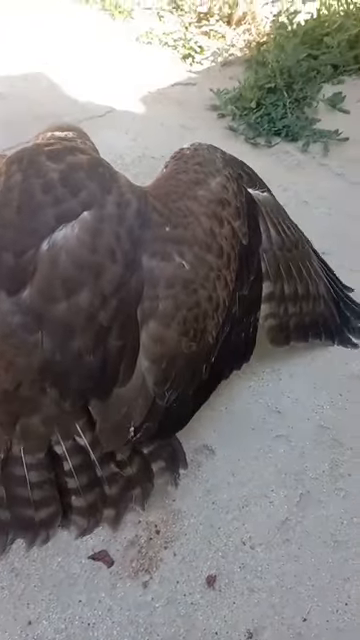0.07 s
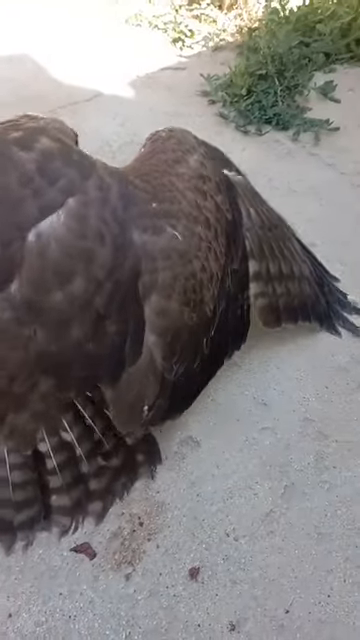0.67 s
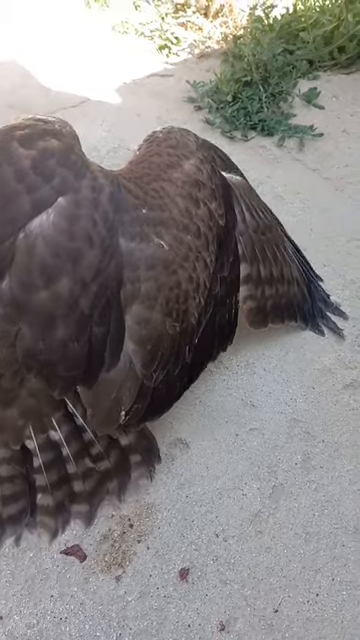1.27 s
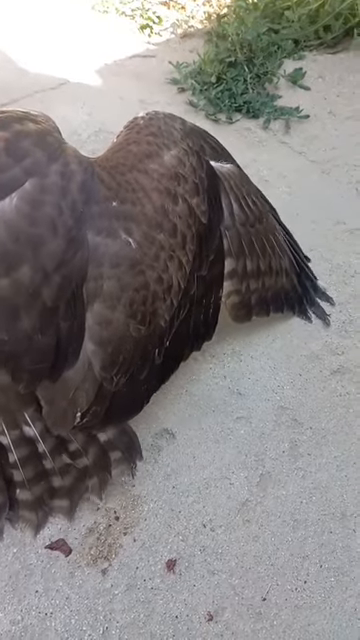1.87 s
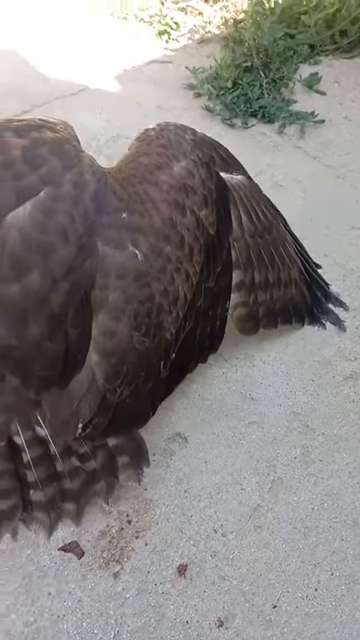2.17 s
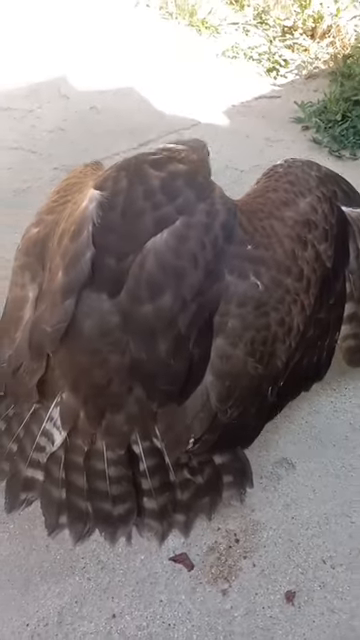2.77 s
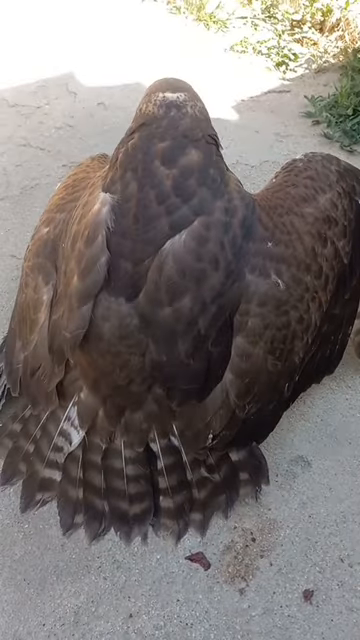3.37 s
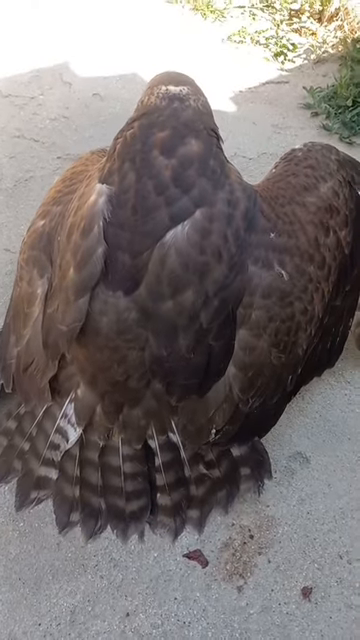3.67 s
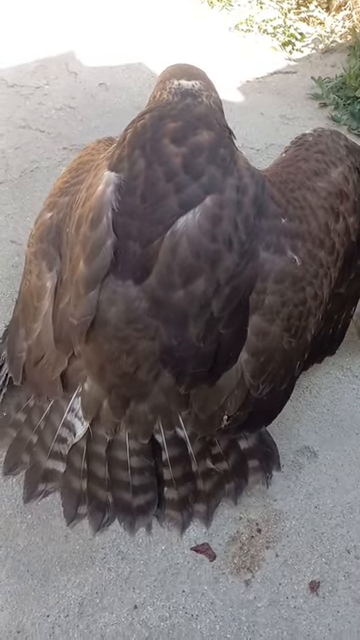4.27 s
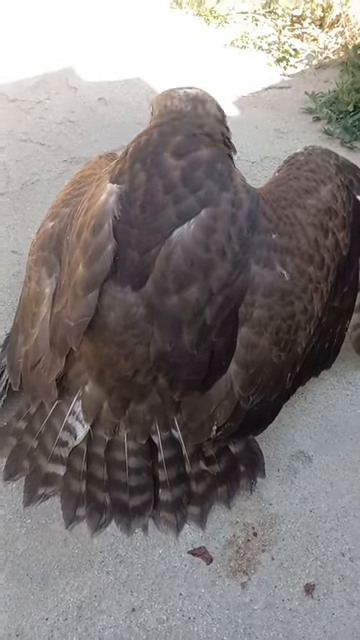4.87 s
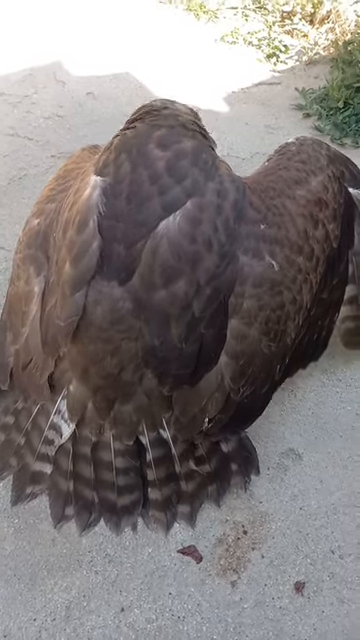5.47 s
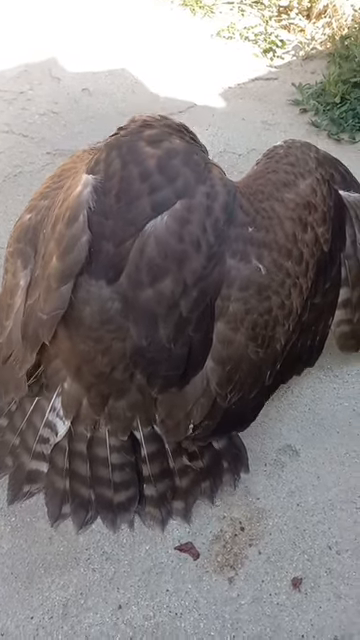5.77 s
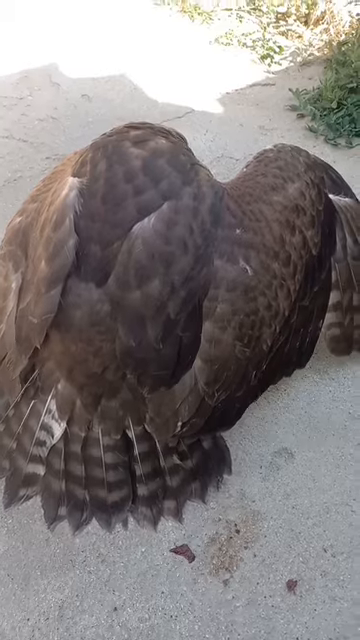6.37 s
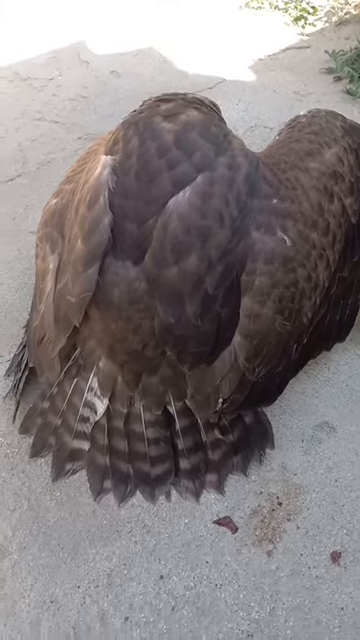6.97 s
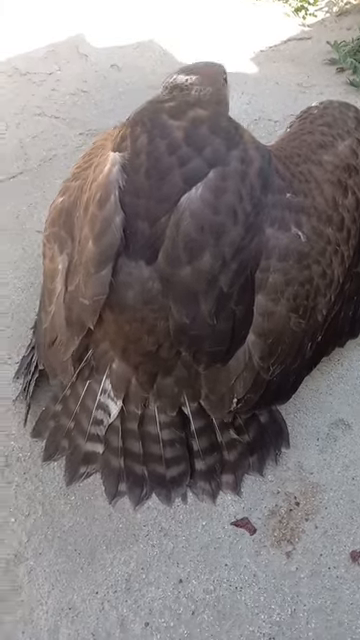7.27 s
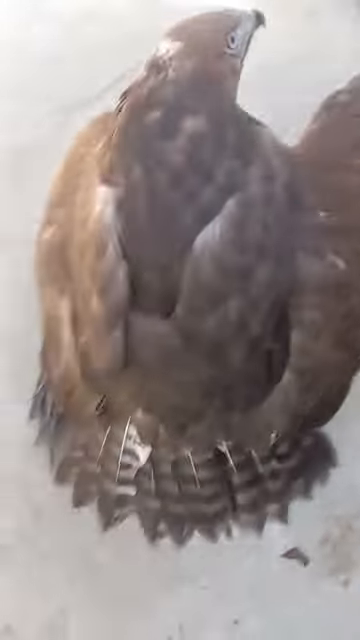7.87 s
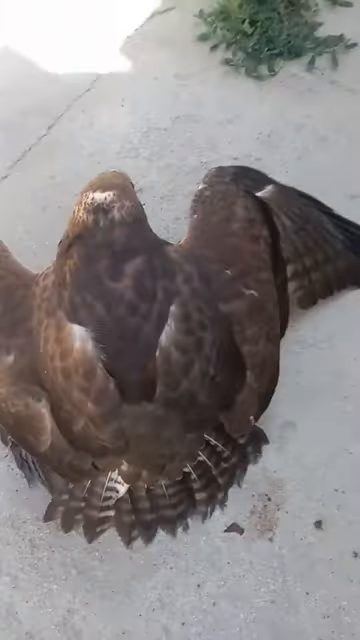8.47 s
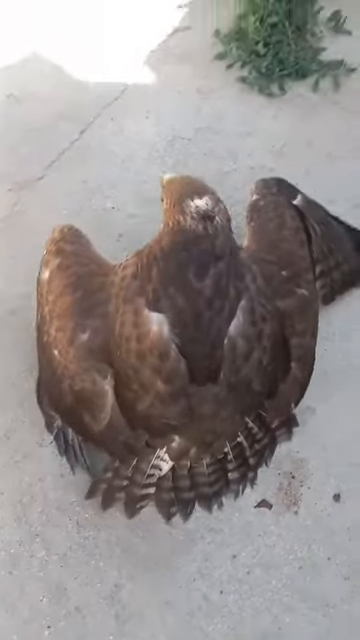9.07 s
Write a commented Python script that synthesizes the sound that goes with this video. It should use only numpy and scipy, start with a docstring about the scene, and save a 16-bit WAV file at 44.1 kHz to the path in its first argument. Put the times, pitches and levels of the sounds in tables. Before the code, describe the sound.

Loud, raspy screeches from a bird of prey rise and crack into short yelps, over soft rustles, scuffs and microphone bumps.

```python
"""A large bird of prey cries five times in a concrete yard and starts a sixth.
Its voice box (the syrinx) makes a rising raspy whistle that cracks, drops to a growling middle note
and ends in a yelp. There the vibration repeats only every second cycle ("doubling"), which adds tones
between the overtones. The yard echoes briefly. Feathers and clothes rustle, a hand rubs and bumps a
camera close by, and a faint low tone comes and goes far away."""
import sys
import numpy as np
from scipy import signal
from scipy.fft import rfft, irfft, next_fast_len
from scipy.io import wavfile

SR = 44100
rng = np.random.default_rng(int(sys.argv[2]) if len(sys.argv) > 2 else 0)


def store_wav(level_fs):
    """Save 16-bit WAV to argv[1]."""
    pcm = np.round(np.clip(np.atleast_2d(level_fs), -1, 1) * 32767)
    wavfile.write(sys.argv[1], SR, pcm.T.astype(np.int16))


N = 402191
TIME = np.arange(N) / SR
CUTOFF_HZ = 15700

# tone colour of rustling feathers and cloth, and of hissing breath: (frequency [Hz], level [dB])
RUSTLE_COLOUR = [(900, -13), (2000, 0), (3500, 1.5), (5800, 3.5), (7500, -7.5), (10000, -3.5), (13000, 0),
                 (16000, 1.5)]
# the whistle that opens each cry: (start [s], end [s], base pitch [Hz], top pitch [Hz],
# curve of the climb [power], final sag [Hz], roughness [0-1], first doubling [dB],
# settled doubling [dB], rasp [dB], hiss [dB], ragged overtones [dB])
WHISTLE_NOTES = [(1.63, 1.972, 3520, 4542, 2.14, 8, 0.21, -21.5, -55, -5, -3, -2.5),
                 (2.683, 2.859, 3500, 4120, 2.75, -2, 0.21, -11.5, -43, 2.5, -8.5, -8.5),
                 (3.85, 4.182, 3513, 4703, 1.45, 1.5, .22, -19.5, -43.5, 4, -8, -5),
                 (5.094, 5.483, 3543, 4810, 0.83, -0.5, 0.15, -13, -56, 1.5, -6, -6),
                 (8.022, 8.392, 3475, 4643, 1.1, 275, 0.053, -32, -59, -3.5, -11.5, -16.5),
                 (9.052, 9.116, 3640, 4020, 1.46, 4.5, 0.26, -21.5, -33, 4, -7, -23)]


def from_db(db):
    """Turn decibels into a factor to multiply by."""
    return 10 ** (np.asarray(db) / 20)


def rms_one(x):
    """Scale a sound to an average strength (rms) of 1."""
    return x / np.sqrt(np.mean(x ** 2) + 1e-20)


def follow(rows, t):
    """Read each column of a timed table at the times t."""
    times, *columns = np.transpose(rows)
    return [np.interp(t, times, column) for column in columns]


def at_hz(colour, hz):
    """The level in dB of a tone colour at these frequencies."""
    points_hz, points_db = np.transpose(colour)
    return np.interp(np.log(hz + 1e-9), np.log(points_hz), points_db)


def coloured(x, colour):
    """Give a sound a tone colour and a strength of 1."""
    size = next_fast_len(len(x))
    hz = np.arange(size // 2 + 1) * SR / size
    spectrum = rfft(x, size) * from_db(at_hz(colour, hz))
    return rms_one(irfft(spectrum, size)[:len(x)])


def wander(rate_hz, size):
    """A smooth random wobble of strength 1, up to about rate_hz fast."""
    pole = np.exp(-2 * np.pi * rate_hz / SR)
    run_in = SR // 10
    smooth = signal.lfilter([1], [1, -2 * pole, pole * pole], rng.standard_normal(size + run_in))
    return rms_one(smooth[run_in:])


def noise(colour, grain_db=0, grain_hz=100):
    """Coloured noise; grain makes it flicker, as when surfaces catch and slip."""
    return coloured(rng.standard_normal(N) * from_db(grain_db * wander(grain_hz, N)), colour)


def noise_band(phase, width_hz):
    """A narrow band of noise that follows a tone."""
    size = len(phase)
    return wander(width_hz, size) * np.sin(phase) + wander(width_hz, size) * np.cos(phase)


def strokes(rows):
    """A loudness curve of sudden starts that each fade by 60 dB in fade_s."""
    out = np.zeros(N)
    for start, db, fade_s in rows:
        first = int(start * SR)
        t = TIME[:min(SR // 2, N - first)]
        out[first:first + len(t)] += from_db(db - 60 * t / fade_s)
    return out


def swell(middle_s, half_s):
    """A bell-shaped rise and fall."""
    return np.exp(-np.minimum(((TIME - middle_s) / half_s) ** 2, 20))


def span(start, end):
    """The times of a note and its progress from 0 to 1."""
    t = TIME[int(start * SR):int(end * SR)]
    return t, np.linspace(0, 1, len(t))


def outdoor_air(level_db=-68):
    """The quiet, steady hush of the air outdoors."""
    # tone colour of the hush: (frequency [Hz], level [dB])
    air_colour = [(18, -44), (30, -12.5), (86, 1.5), (179, -6.5), (345, 1.5), (649, -12), (1160, -11.5),
                  (2750, -5.5), (3400, -24.5), (5450, -26.5), (8300, -34), (14800, -13.5), (16000, -21)]
    return from_db(level_db) * noise(air_colour)


def opening_ring(level_db=-45, fade_s=0.42):
    """At the start the yard still rings from an earlier yelp."""
    # tone colour of the ringing: (frequency [Hz], level [dB])
    ring_colour = [(1400, -41), (1750, -15), (1900, -6), (2150, -20), (2650, -12), (2950, -1), (3200, -23),
                   (3650, -12), (4500, -25), (7000, -47)]
    return strokes([(0, level_db, fade_s)]) * noise(ring_colour)


def handling(usual_loudness_db=-60, rumble_db=-57, rub_db=-64, rustle_db=-60.5):
    """A hand rumbles and rubs on the camera while feathers and cloth rustle; all swell and fade."""
    # loudness of the close rumble, rubbing and rustle; near 8.56 s the sound drops away deeply for a moment:
    # (time [s], level [dB])
    loudness = [(0.0, -61), (0.56, -55.5), (0.73, -65.5), (1.55, -51.5), (1.73, -45), (1.78, -47.5),
                (2.31, -62), (3.76, -71), (4.01, -62.5), (4.57, -65.5), (4.62, -65), (5.26, -68),
                (5.36, -59.5), (5.74, -65.5), (6.88, -58.5), (6.96, -54), (6.99, -56), (7.34, -51),
                (7.72, -49), (7.87, -40.5), (8.26, -49.5), (8.41, -45.5), (8.56, -83.5), (8.66, -54.5),
                (8.74, -61), (9.12, -71)]
    # feathers and cloth sweep past: (middle [s], half length [s], rustle [dB], rubbing [dB])
    sweeps = [(0.006, 0.11, -60.5, -71), (0.313, 0.11, -53.5, -61), (0.496, 0.063, -45.5, -53),
              (0.803, 0.17, -54, -64.5), (1.25, 0.084, -55.5, -63), (4.671, 0.022, -64, -67.5),
              (4.827, .04, -58, -61.5), (6.229, 0.039, -75, -60), (7.249, 0.032, -43, -63.5),
              (7.59, 0.12, -51, -58.5), (7.881, 0.13, -39.5, -50.5), (8.29, 0.17, -44, -64),
              (8.733, 0.3, -58.5, -63.5), (8.93, 0.028, -45, -56)]
    # tone colours of the hand's rumble and rubbing: (frequency [Hz], level [dB])
    rumble_colour = [(18, -59), (30, -18), (92, -1), (140, -0.5), (178, -4), (219, 0), (397, -1),
                     (517, -4.5), (559, -10), (700, -16.5), (910, -47.5), (1540, -120)]
    rub_colour = [(250, -23.5), (450, 1.5), (800, 4), (1500, 1.5), (2500, 1), (5000, -28)]
    change_db = follow(loudness, TIME)[0] - usual_loudness_db
    rub_level = from_db(rub_db + change_db)
    rustle_level = from_db(rustle_db + 0.47 * change_db)
    for middle_s, half_s, sweep_rustle_db, sweep_rub_db in sweeps:
        sweep = swell(middle_s, half_s)
        rub_level += from_db(sweep_rub_db) * sweep
        rustle_level += from_db(sweep_rustle_db) * sweep
    rumble = from_db(rumble_db + change_db) * noise(rumble_colour, grain_db=2, grain_hz=25.3)
    rub = rub_level * noise(rub_colour, grain_db=1.5, grain_hz=60)
    rustle = rustle_level * noise(RUSTLE_COLOUR, grain_db=2, grain_hz=45)
    return rumble + rub + rustle


def far_tone(pitch_hz=348.6, fade_s=0.064, waver_db=3.5):
    """Faint, wavering low notes in the distance."""
    # the far notes: (start [s], end [s], level [dB])
    notes = [(-.05, 0.233, -53.5), (0.585, 0.81, -51.5), (1.012, 1.116, -51.5), (1.203, 1.45, -52.5),
             (1.645, 2.08, -52), (2.28, 2.482, -64.5), (2.514, 2.925, -57), (3.948, 4.677, -53),
             (4.776, 5.099, -57), (5.297, 5.494, -53), (5.656, 5.76, -61), (5.942, 6.077, -54.5),
             (6.12, 6.328, -47.5), (6.37, 6.565, -44), (6.849, 7.08, -46.5), (7.137, 7.503, -49)]
    level = sum(from_db(db) * np.clip(np.minimum(TIME - start, end - TIME) / fade_s, 0, 1)
                for start, end, db in notes)
    phase = 2 * np.pi * np.cumsum(pitch_hz * (1 + .018 * wander(12, N))) / SR
    return level * from_db(waver_db * wander(38, N)) * np.sin(phase)


def camera_bumps():
    """Each bump of the hand on the camera gives a dull thud and a tick."""
    # the bumps: (time [s], thud level [dB], tick against thud [dB], time to fade by 60 dB [s])
    bumps = [(0.321, -29.5, -22, 0.031), (.549, -50, -12, 0.061), (0.599, -46, -12, 0.078),
             (7.211, -57, -16, 0.072), (7.828, -45, 12, 0.12), (7.853, -29, 10.5, 0.02),
             (8.659, -35, -19, 0.054)]
    # tone colours of the thud and the tick: (frequency [Hz], level [dB])
    thud_colour = [(50, -23), (130, -7), (330, 1), (600, -1.5), (1200, -9.5), (2500, -16), (6000, -32)]
    tick_colour = [(500, -12), (1500, 0), (3000, 0), (6000, -2), (8000, -14), (15000, -16), (17000, -50)]
    thuds = strokes([(start, db, fade_s) for start, db, _, fade_s in bumps])
    ticks = strokes([(start, db + tick_db, fade_s) for start, db, tick_db, fade_s in bumps])
    return thuds * noise(thud_colour) + ticks * noise(tick_colour)


def scuffs(fade_s=.17, peak_above_average_db=8.5):
    """Feathers and claws scuff the concrete in sudden grainy scrapes."""
    # the scrapes: (time [s], peak level [dB])
    scrapes = [(1.3633, -33), (1.4117, -35), (2.4723, -41), (3.3413, -41), (3.6661, -47), (3.8167, -47),
               (4.6059, -42), (4.7994, -46), (4.8843, -41), (4.9392, -42), (6.9656, -37), (7.0359, -36),
               (7.1437, -34), (7.2654, -38), (7.4215, -38)]
    # tone colour of a scrape: (frequency [Hz], level [dB])
    scrape_colour = [(600, -22), (1500, -8), (2600, 0), (5500, 0), (7500, -10), (12000, -10), (16000, -14),
                     (17000, -50)]
    level = strokes([(start, db - peak_above_average_db, fade_s) for start, db in scrapes])
    return level * noise(scrape_colour, grain_db=2, grain_hz=400)


def breath_rasp(pitch, phase, rough, band_hz=220, ring_db=-9):
    """The vibration chops the rushing air, so its noise gathers at every half step of the overtones."""
    # tone colours of the rasp and of the throat ringing with it: (frequency [Hz], level [dB])
    rasp_colour = [(500, -20), (1300, -19), (2000, -6), (2700, -4.5), (3400, -13.5), (4400, 11),
                   (5400, -0.5), (6200, -2), (7300, -11.5), (10500, -13.5), (13500, -15.5), (16000, -18)]
    ring_colour = [(1300, -30.5), (2150, -8.5), (2500, -2.5), (2850, -0.5), (3150, -7.5), (3800, -30.5)]
    size = len(pitch)
    bands = np.zeros(size)
    for multiple in np.arange(2, 17) / 2:
        band = noise_band(multiple * phase, band_hz) * (multiple * pitch < CUTOFF_HZ)
        bands += band * from_db(3 * wander(25, size))
    rasp = coloured(rms_one(bands) + .36 * rng.standard_normal(size), rasp_colour)
    ring = coloured(rng.standard_normal(size), ring_colour)
    return rasp + from_db(ring_db) * 2 * np.sqrt(rough) * ring


def syrinx(t, pitch, level_db, doubling_db, rough, rasp_db, growl_ratio=0.96):
    """One note: breath shakes the membranes of the voice box; throat and beak shape the overtones."""
    # how the bird holds itself in each cry: (beak opening [factor on the throat's frequencies],
    # beak ring [dB], undertone [dB], top overtones [dB])
    postures = [(1.01, -3.5, -12.5, 5), (1.018, -2.5, -11, 3), (0.975, -4.5, -3.5, 0.5),
                (1.026, -2, -2.5, 7.5), (0.73, 4.5, -0.5, -21.5), (0.88, 8, -0.5, -8)]
    # how well throat and open beak pass each tone: (frequency [Hz], level [dB])
    throat = [(800, 4), (1100, 0), (1450, 13), (1850, 4), (2850, 10), (3800, -3), (4600, -10), (5600, -27),
              (7000, -25.5), (9300, -40.5), (11500, -45), (13500, -36), (15500, -44)]
    # the fifth whistle briefly repeats only every third cycle: (time [s], level of added tones [dB])
    tripling = [(8.17, -53), (8.25, -50.5), (8.34, -39), (8.37, -65.5)]
    pitch_shake, level_shake, flutter_hz = .025, .49, 330
    beak_hz, beak_width_hz, top_hz, slap_hz = 7050, 2000, 10300, 6000
    middle_hz, middle_width_hz, fade_s = 2867, 240, 0.002
    cry = sum(note[0] < t[-1] for note in WHISTLE_NOTES) - 1
    opening, beak_db, undertone_db, top_db = postures[cry]
    first, size = int(round(t[0] * SR)), len(t)
    rough = np.clip(rough, 0, 1)
    # with strong, clean doubling the membranes lock and slap shut: sharper overtones, less leaking air
    locked = np.clip(1 + doubling_db / 16, 0, 1) * (1 - rough)
    # roughness shakes both the pitch and the strength of the vibration
    shake = 1 + pitch_shake * rough * wander(flutter_hz, size) + 0.003 * wander(48, size)
    phase = 2 * np.pi * np.cumsum(pitch * shake) / SR

    # the tones in the voice: (multiple of the pitch, level [dB])
    tripling_db = np.interp(t, *np.transpose(tripling), left=-120, right=-120)
    tones = [(k, 0) for k in range(1, 9)] + [(k / 2, doubling_db) for k in range(3, 16, 2)]
    tones += [(k / 3, tripling_db) for k in (2, 4, 5)] + [(1 / 3, tripling_db - 16)]
    tones += [(.5, 1.3 * doubling_db + undertone_db)]  # the undertone needs strong doubling
    voice = np.zeros(size)
    for multiple, share_db in tones:
        hz = multiple * pitch
        throat_db = at_hz(throat, hz / opening) - at_hz(throat, pitch / opening)
        ring_db = beak_db * np.exp(-((hz - beak_hz) / beak_width_hz) ** 2)
        treble_db = top_db * np.clip(4 * (hz / top_hz - 1) + 1, 0, 1)
        slap_db = 4 * locked * np.clip(hz / slap_hz - .5, 0, 1)
        gain = from_db(share_db + throat_db + ring_db + treble_db + slap_db) * (hz < CUTOFF_HZ)
        voice += gain * np.sin(multiple * phase) * (1 + level_shake * rough * wander(flutter_hz, size))
    # the growl: an unsteady tone just under the pitch beats with it, a little more on middle notes
    growl = .75 * rough + .06 * np.exp(-((pitch - middle_hz) / middle_width_hz) ** 2)
    voice += growl * noise_band(growl_ratio * phase, width_hz=130)
    power = 1 + (level_shake * rough) ** 2 + 2 * growl ** 2
    voice *= np.sqrt(2 / power) * from_db(level_db)
    rasp = breath_rasp(pitch, phase, rough) * from_db(rasp_db - 5 * locked + 2 * wander(100, size))
    edges = np.clip(np.minimum(t - t[0], t[-1] - t) / fade_s, 0, 1)
    return np.pad((voice + rasp) * edges, (first, N - first - size))


def whistles(scoop_hz=613, scoop_s=0.014, sag_s=0.0288, settle_s=0.16):
    """The pitch scoops up and climbs as the doubling fades; escaping air adds hiss and ragged tones."""
    # the bird's effort, one list for each whistle: (time [s], tone [dB], escaping air [dB])
    efforts = [
        [(1.625, -54, -56), (1.633, -46.5, -54), (1.667, -33.5, -49), (1.739, -18.5, -46),
         (1.773, -19.5, -39.5), (1.803, -18.5, -35.5), (1.807, -28.5, -36), (1.839, -16.5, -38.5),
         (1.963, -20, -37), (1.97, -21.5, -30.5)],
        [(2.68, -59, -61.5), (2.69, -43.5, -58), (2.734, -55, -54.5), (2.752, -37.5, -65), (2.768, -28, -50.5),
         (2.818, -42, -39.5), (2.856, -21, -43.5)],
        [(3.849, -57, -69), (3.899, -34.5, -62.5), (3.957, -35.5, -59), (3.975, -30, -58.5),
         (3.983, -29, -53.5), (4.031, -27, -49.5), (4.045, -31, -44.5), (4.101, -23, -45), (4.135, -24, -47.5),
         (4.18, -24, -40.5)],
        [(5.094, -65.5, -81), (5.118, -53.5, -67.5), (5.216, -44.5, -56.5), (5.326, -30, -48.5),
         (5.348, -28.5, -50.5), (5.374, -30.5, -45.5), (5.418, -28, -46), (5.48, -26, -39)],
        [(8.026, -26.5, -52), (8.042, -18, -32), (8.138, -26, -43.5), (8.192, -21.5, -27.5),
         (8.214, -12.5, -25.5), (8.222, -20.5, -26), (8.266, -17.5, -39.5), (8.294, -24.5, -42.5),
         (8.354, -20.5, -38), (8.38, -28.5, -40)],
        [(9.055, -39.5, -69), (9.079, -40.5, -44), (9.091, -44, -43.5), (9.115, -27, -39)],
    ]
    # overtones torn into wide bands: (multiple of the pitch [factor], width [Hz], level [dB])
    ragged_bands = [(1.299, 380, -4), (1.98, 299.1, -7), (2.35, 350, -12.5), (2.98, 300, -5.5)]
    # the voice catches harshly: (middle [s], half length [s], boost of the ragged bands [dB])
    catches = [(3.99, .012, 7.5), (5.38, 0.019, 5), (8.074, .016, 11.5), (8.225, .02, 1)]
    catch_db = sum(db * swell(middle_s, half_s) for middle_s, half_s, db in catches)
    out, hiss_level = np.zeros(N), np.zeros(N)
    for note, effort in zip(WHISTLE_NOTES, efforts):
        start, end, base_hz, top_hz, curve, sag_hz, rough = note[:7]
        first_db, settled_db, rasp_db, hiss_db, ragged_db = note[7:]
        t, progress = span(start, end)
        size, first = len(t), int(start * SR)
        during = slice(first, first + size)
        tone_db, air_db = follow(effort, t)
        pitch = top_hz - (top_hz - base_hz) * (1 - progress) ** curve
        pitch -= scoop_hz * np.exp(-(t - start) / scoop_s) + sag_hz * np.exp((t - end) / sag_s)
        pitch *= 1 + .005 * wander(14, size)
        tone_db += 1.5 * wander(35, size)
        doubling_db = settled_db + (first_db - settled_db) * np.exp(-(t - start) / settle_s)
        out += syrinx(t, pitch, tone_db, doubling_db, rough, air_db + rasp_db, growl_ratio=0.95)
        phase = 2 * np.pi * np.cumsum(pitch) / SR
        for multiple, width_hz, db in ragged_bands:
            band = noise_band(multiple * phase, width_hz)
            flutter_db = 3.5 * wander(40, size)
            out[during] += band * from_db(air_db + ragged_db + catch_db[during] + db + flutter_db)
        hiss_level[during] += from_db(air_db + hiss_db)
    return out + hiss_level * noise(RUSTLE_COLOUR, grain_db=4, grain_hz=90)


def cracks(edge_db=-17.5, doubling_db=-40):
    """The whistle gives way in a short downward slide, loudest halfway through."""
    # the slides: (start [s], end [s], start pitch [Hz], end pitch [Hz], lateness of the fall [power],
    # peak level [dB], roughness [0-1], rasp [dB])
    slides = [(1.971, 1.996, 4600, 3510, 1.03, -6.5, .05, -31),
              (2.854, 2.884, 4070, 3090, 1.85, -17, 0.05, -35.5),
              (4.183, 4.206, 4650, 2784, 1.9, -12, 0.48, -38),
              (5.483, 5.505, 4765, 2610, 1.7, -22, 0.24, -32.5),
              (8.381, 8.399, 4340, 2618, 3, -18.5, 1.1, -26)]
    out = np.zeros(N)
    for start, end, start_hz, end_hz, lateness, peak_db, rough, rasp_db in slides:
        t, progress = span(start, end)
        pitch = start_hz + (end_hz - start_hz) * progress ** lateness
        level_db = peak_db + edge_db * abs(2 * progress - 1)
        out += syrinx(t, pitch, level_db, doubling_db, rough, rasp_db)
    return out


def middle_notes(attack_s=0.009, break_s=0.0045, plunge_hz=420, plunge_s=.0045):
    """A gently bent, growling note that ends in a plunge, roughest where the voice breaks in and out."""
    # the notes: (start [s], end [s], start pitch [Hz], pitch before the plunge [Hz], arch [Hz],
    # early level [dB], end level [dB], doubling [dB], roughness [0-1], rasp [dB])
    notes = [(1.991, 2.111, 2820, 2827, 133.5, -21.5, -16.5, -12.5, 0.26, -35.5),
             (2.875, 2.909, 2766, 2700, 6.5, -29, -26, -10, 0.3, -45),
             (2.894, 2.946, 2136, 2152, 9, -26.5, -27, -9, 0.1, -34),
             (4.2, 4.319, 2777, 2645, 98.5, -7, -15, -36.5, 0.06, -43),
             (5.5, 5.622, 3004, 2940, 67, -17.5, -18, -32.5, 0.05, -39.5),
             (8.392, 8.451, 2526, 2786, 293, -11, -26.5, -27, 0.37, -50),
             (8.447, 8.554, 2590, 2427, -25.5, -11.5, -17.5, -32, 0.11, -57)]
    out = np.zeros(N)
    for start, end, start_hz, end_hz, arch_hz, early_db, end_db, doubling_db, rough, rasp_db in notes:
        t, progress = span(start, end)
        arch = 1 - (2 * progress - 1) ** 2
        pitch = start_hz + (end_hz - start_hz) * progress + arch_hz * arch
        pitch -= plunge_hz * np.exp((t - end) / plunge_s)
        level_db = early_db + (end_db - early_db) * progress - 10 * np.exp(-(t - start) / attack_s)
        breaking = np.exp(-np.minimum(t - start, end - t) / break_s)
        out += syrinx(t, pitch, level_db, doubling_db, rough + .3 * breaking, rasp_db, growl_ratio=.93)
    return out


def yelps(lock_s=0.0023, fade_db=20):
    """A low note locks into doubling, holds, then droops, frays and fades as the breath runs out."""
    # the yelps: (start [s], end [s], start pitch [Hz], end pitch [Hz], lateness of the droop [power],
    # level [dB], base doubling [dB], base roughness [0-1], rasp [dB])
    notes = [(2.108, 2.174, 1920, 1528, 2.7, -14.5, -11.5, .05, -35.5),
             (2.937, 3.084, 1920, 1647, 3.3, -17.5, -4, .025, -35.5),
             (4.32, 4.382, 1928, 1632, 1.8, -15, -16, 0, -56),
             (5.618, 5.68, 2130, 1682, 2.1, -16.5, -12.5, 0.16, -31),
             (8.552, 8.595, 1923, 1528, 1.2, -15, -13.5, 0.11, -51.5)]
    out = np.zeros(N)
    for start, end, start_hz, end_hz, lateness, db, base_doubling_db, base_rough, rasp_db in notes:
        t, progress = span(start, end)
        pitch = start_hz + (end_hz - start_hz) * progress ** lateness
        fading = progress ** 3.16
        unlocked = np.exp(-(t - start) / lock_s)
        doubling_db = base_doubling_db + 8 * progress - 13 * unlocked
        rough = base_rough + .18 * unlocked + .08 * fading
        drop_db = fade_db * fading
        out += syrinx(t, pitch, db - drop_db, doubling_db, rough, rasp_db - .6 * drop_db)
    return out


def yard(bird, treble_hz=5400, dull_hz=11000, scatter_s=0.059, tail_s=0.32, tail_db=-20.5):
    """The bird faces away, so its treble mostly arrives scattered off the ground; short echoes follow."""
    # echoes off ground and walls: (delay [s], level [dB])
    echoes = [(.0042, -17.5), (0.0131, -18), (0.025, -28.5), (.058, -32.5)]
    t = TIME[:SR]
    lows = signal.sosfilt(signal.butter(6, treble_hz, fs=SR, output="sos"), bird)
    treble = signal.sosfilt(signal.butter(6, treble_hz, "high", fs=SR, output="sos"), bird)
    direct = lows - from_db(-7) * treble
    scatter = rng.standard_normal(SR) * from_db(-60 * t / scatter_s)
    scattered = from_db(-1) * signal.fftconvolve(treble, scatter / np.linalg.norm(scatter))[:N]
    build_up = 1 - np.exp(-t / .02)
    tail = rng.standard_normal(SR) * from_db(-60 * t / tail_s) * build_up
    response = from_db(tail_db) * tail / np.linalg.norm(tail)
    for delay, db in echoes:
        response[int(delay * SR)] += from_db(db)
    response = signal.sosfilt(signal.butter(2, dull_hz, fs=SR, output="sos"), response)
    return direct + scattered + signal.fftconvolve(bird, response)[:N]


def far_hum(pitch_hz=522, level_db=-46):
    """A faint hum swells and fades once, around the fifth cry."""
    hum = np.sqrt(2) * np.sin(2 * np.pi * pitch_hz * TIME)
    return from_db(level_db) * swell(middle_s=8.14, half_s=0.21) * hum


def scene():
    """The bird in its yard, with the small noises nearby and the quiet outdoors, in one channel."""
    bird = yard(whistles() + cracks() + middle_notes() + yelps())
    nearby = handling() + camera_bumps() + scuffs()
    background = outdoor_air() + opening_ring() + far_tone() + far_hum()
    return (bird + nearby + background)[None]


def record(dry):
    """The microphone drops the deepest bass and the highest treble."""
    without_bass = signal.sosfilt(signal.butter(2, 50, "high", fs=SR, output="sos"), dry)
    return signal.sosfilt(signal.ellip(10, .2, 80, CUTOFF_HZ, fs=SR, output="sos"), without_bass)


dry = scene()
out = record(dry)
store_wav(out)
```